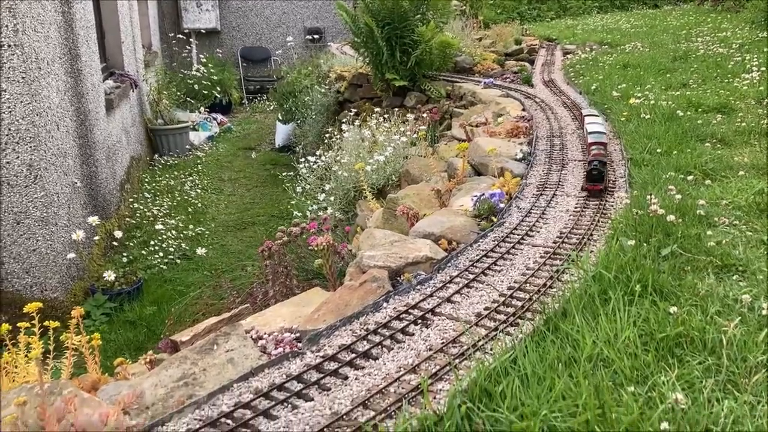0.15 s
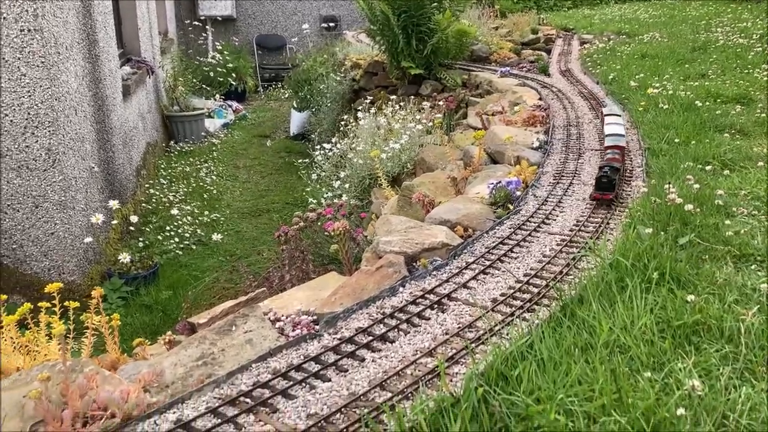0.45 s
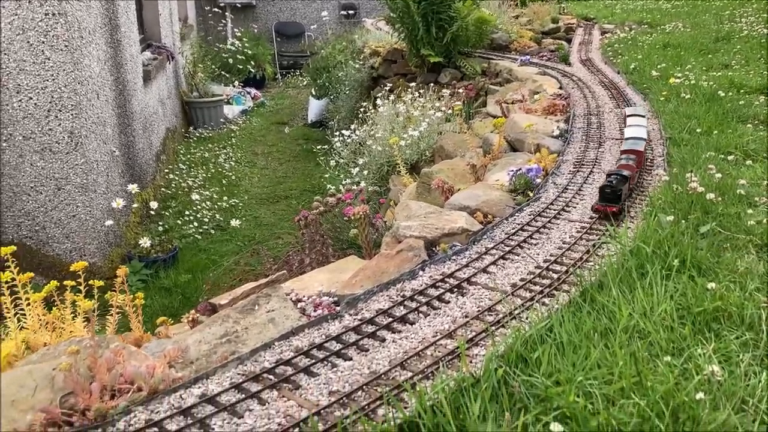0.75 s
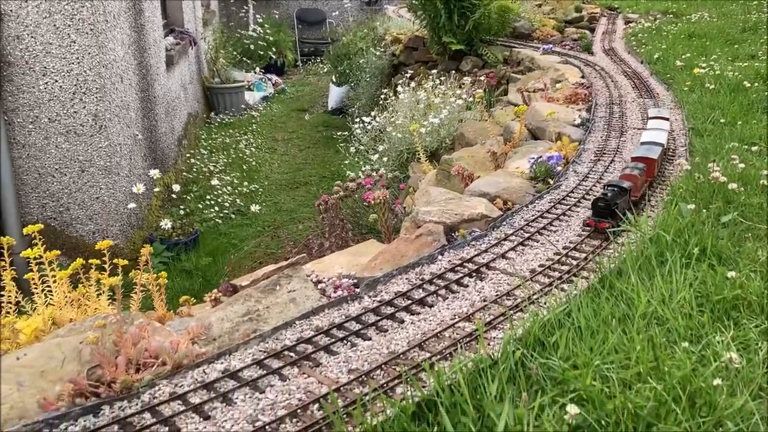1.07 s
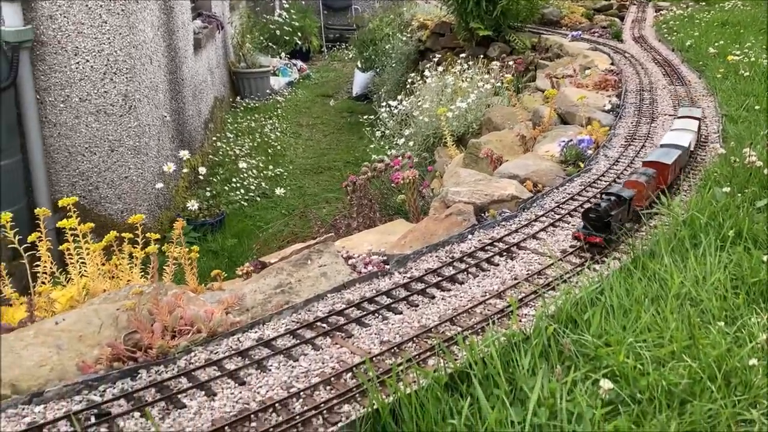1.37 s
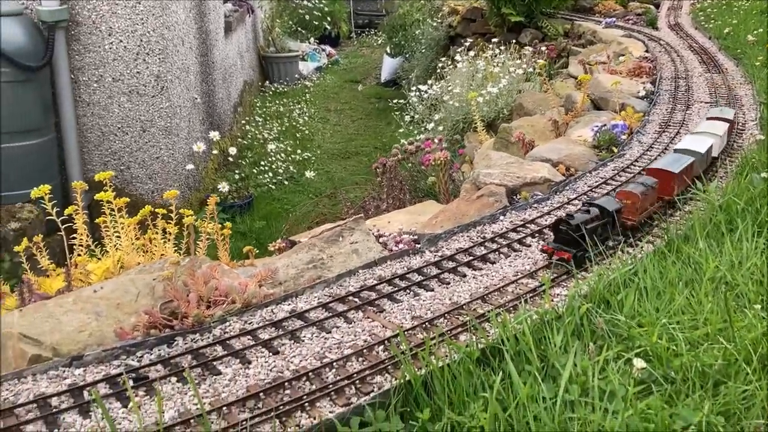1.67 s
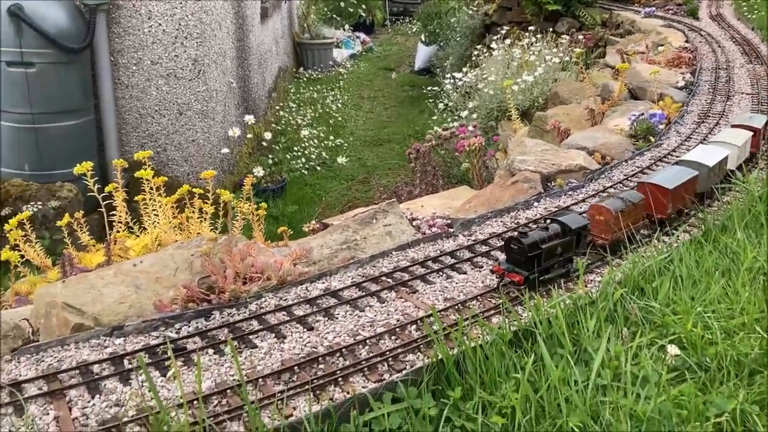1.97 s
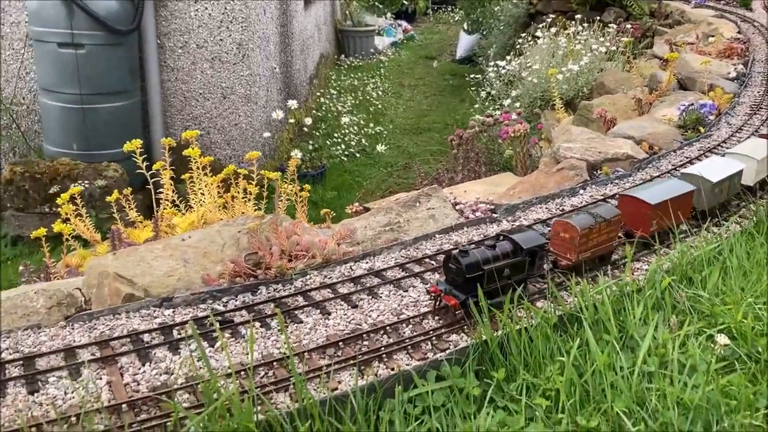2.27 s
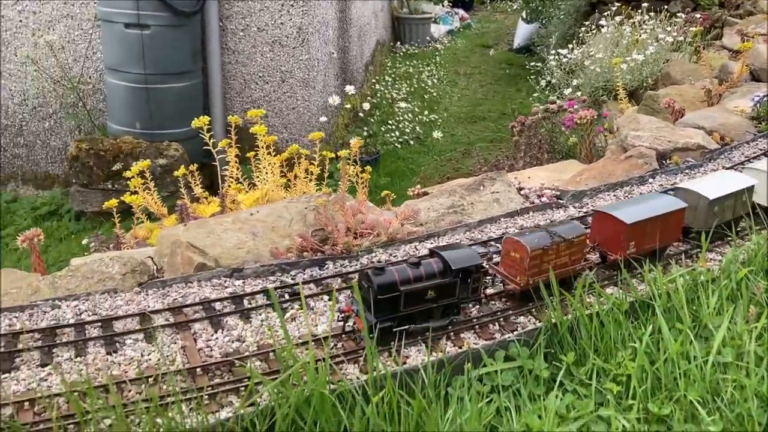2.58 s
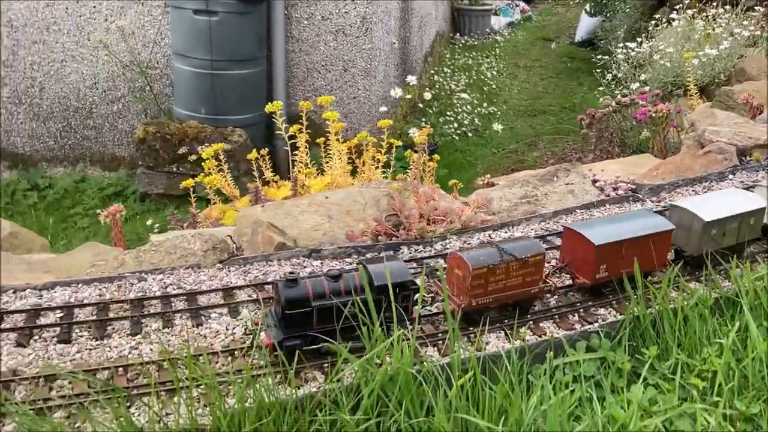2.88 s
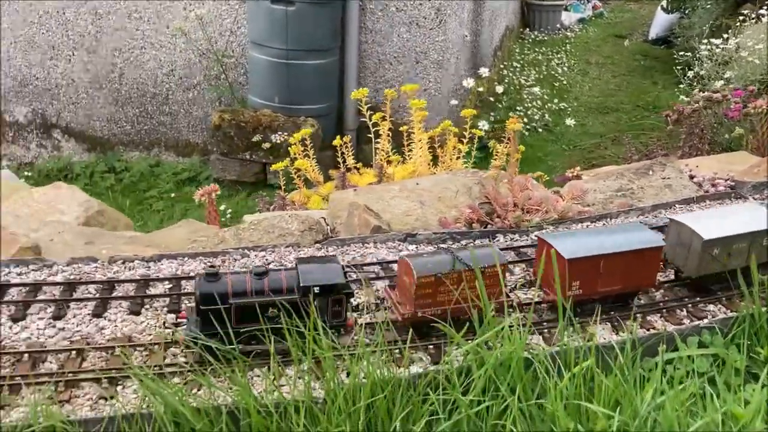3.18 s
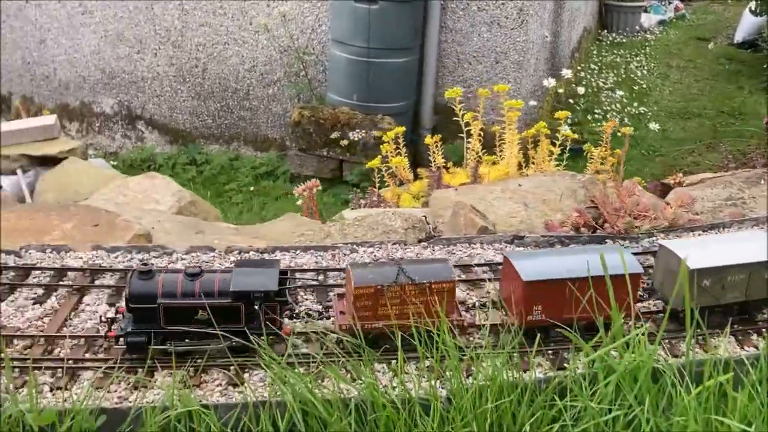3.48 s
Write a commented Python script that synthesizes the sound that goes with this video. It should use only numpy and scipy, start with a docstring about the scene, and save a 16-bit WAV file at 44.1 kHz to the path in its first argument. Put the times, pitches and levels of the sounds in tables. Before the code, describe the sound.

A clockwork tinplate train approaches along a garden track, droning and rattling brightly, with sharp uneven clacks at rail joints and small flange pings; hollow wagons drum louder as it passes close to a wind-buffeted outdoor microphone.

```python
"""A clockwork tinplate train comes along a garden track, droning and rattling from the start, and passes close by.
Tiny bumps under the wheels ring the track and, as the train nears, the hollow wagons drum louder.
Noise shaped by small ticks makes the rattle of gears and couplings; sudden cracks are wheels on rail joints.
Short rubs make the flanges ping. Low noise in puffs is a light wind buffeting the microphone."""
import sys
import numpy as np
from scipy import signal
from scipy.fft import rfft, irfft, next_fast_len
from scipy.io import wavfile
from scipy.ndimage import uniform_filter1d

SR = 44100
rng = np.random.default_rng(int(sys.argv[2]) if len(sys.argv) > 2 else 0)


def put_to_file(sound):
    """Save the sound as 16-bit audio at rate SR, in the file named by the first command-line argument."""
    columns = np.atleast_2d(sound).T  # one column per channel
    safe = np.clip(columns, -1, 1)
    whole_steps = np.round(safe * 32767)
    wavfile.write(sys.argv[1], SR, whole_steps.astype(np.int16))


N = 160524

# Likeness says how alike left and right are (1 = the same); a negative pan leans to the right.
DRONE_LIKENESS, BODY_PAN_DB = 0.6, -0.5


def track():
    """The rails and their bed drone under the wheels, with no bass; one rail sings out of the bend."""
    # Level of the drone. Each row: time in seconds, level in dB.
    drone_curve = [(0, -51), (.55, -48.5), (2.55, -49.5), (2.85, -52), (3.64, -53)]
    # Resonances of the track. Each row: pitch in Hz, width in Hz, strength in dB.
    track_modes = [(648, 72, -4), (782, 51, -3.5), (876, 37, 1.5), (951.4, 72, -2), (1276, 150, -9.5),
                   (2150, 450, -15.5)]
    # Level of the singing rail. Each row: time in seconds, level in dB.
    singing_curve = [(1.7, -71), (2.05, -57), (2.5, -56), (2.8, -63)]
    # Resonance of that rail. Each row: pitch in Hz, width in Hz, strength in dB.
    rail_mode = [(1826, 39, 0)]
    low_hz, drone_pan_db = 520, -5
    drone = rolling(track_modes, DRONE_LIKENESS, drone_pan_db)
    thin = signal.butter(2, low_hz, "high", fs=SR, output="sos")
    drone = signal.sosfilt(thin, drone)
    singing = rolling(rail_mode, DRONE_LIKENESS, BODY_PAN_DB)
    return level(drone_curve) * drone + level(singing_curve) * singing


def wagons():
    """Hollow tin bodies drum, and boom when jolted; the track bed rumbles under their weight."""
    # Level of the drumming. Each row: time in seconds, level in dB.
    drum_curve = [(0, -56), (1.7, -57), (2.1, -53), (3.0, -49.5), (3.4, -45)]
    # Jolts that make a body boom. Each row: middle in seconds, half length in seconds, level in dB.
    jolts = [(2.842, 0.0075, -42), (2.962, 0.012, -43), (3.073, 0.004, -41.5), (3.334, 0.016, -49),
             (3.494, 0.017, -42.5)]
    # Resonances of the wagon bodies. Each row: pitch in Hz, width in Hz, strength in dB.
    body_modes = [(307, 200, -2), (564, 58, 2.5), (880, 145, 0), (1105, 250, 3.5), (1208, 40, 2),
                  (1388, 115, 1.5), (1622, 110, 1), (1820, 220, 2.5)]
    # Level of the rumble. Each row: time in seconds, level in dB.
    rumble_curve = [(0, -77), (1.5, -83.5), (2.3, -67)]
    # Resonance of the track bed. Each row: pitch in Hz, width in Hz, strength in dB.
    bed_mode = [(197.7, 102, 0)]
    body_likeness = 0.33
    drumming = rolling(body_modes, body_likeness, BODY_PAN_DB)
    # Two passes through the resonance make the rumble narrower.
    rumble = resonate(resonate(pair(DRONE_LIKENESS), bed_mode), bed_mode)
    return surging(drum_curve, jolts) * drumming + level(rumble_curve) * rumble


def rolling(modes, likeness, pan_db):
    """Tiny bumps under the wheels set a set of resonances ringing."""
    bumps_per_s, throb_db = 5000, 0.66
    low_hz, high_hz = 352, 2550
    hits = rng.random(N) < bumps_per_s / SR
    bumps = pair(likeness, pan_db) * hits * throb(throb_db)
    band = signal.butter(2, [low_hz, high_hz], "band", fs=SR, output="sos")
    return rms_one(signal.sosfilt(band, resonate(bumps, modes)))


def throb(depth_db):
    """Swing of level, up and down by the depth, with each turn of the driving wheels."""
    # Speed of the wheels, slowing a little. Each row: time in seconds, speed in turns per second.
    wheel_speed = [(0, 7.4), (2.6, 6.92), (3.3, 5.85)]
    tight_spot_turns = 0.25  # where in each turn the wheels bind
    turns = np.cumsum(np.interp(clock(), *np.transpose(wheel_speed))) / SR
    return rms_one(from_db(depth_db * np.cos(2 * np.pi * (turns - tight_spot_turns))))


def rattle():
    """Large and small loose parts rustle with each wheel turn, partly in step; joints strike them all."""
    # Level of the rattle of gears and couplings. Each row: time in seconds, level in dB.
    rattle_curve = [(0, -47.5), (1.3, -45.5), (1.95, -42), (2.45, -44), (2.6, -44), (2.9, -40),
                    (3.27, -45.5), (3.64, -40.5)]
    throb_db, flurry_low_db = 1, -3.5
    split_hz, own_share = 7000, .4  # large parts sound below the split, small ones above
    swing = rms_one(shake() * throb(throb_db))
    steady = (level(rattle_curve) * swing) ** 2
    shared, flurry, joints = ticking(), flurries(), clacks()
    out = 0
    for side, flurry_db in (("low", flurry_low_db), ("high", 0)):
        grain = (1 - own_share) * shared + own_share * ticking()
        power = (steady + from_db(flurry_db) ** 2 * flurry) * grain + joints
        split = signal.butter(2, split_hz, side, fs=SR, output="sos")
        out = out + signal.sosfilt(split, steel(power))
    return out


def ticking():
    """Power of small ticks at uneven gaps over the whirr of the gears; mean 1."""
    ticks_per_s, spread_db, t60_s = 130, 2.9, .019
    whirr_db = -4.5  # against the mean power of the ticks
    gaps = rng.gamma(2, .5, N // 100)  # mean 1
    at = (np.cumsum(gaps) * SR / ticks_per_s).astype(int)
    at = at[at < N]
    ticks = np.zeros(N)
    ticks[at] = from_db(spread_db * np.clip(rng.standard_normal(len(at)), -2, 2)) ** 2
    # Power falls by 60 dB in t60_s; from_db is for amplitude, hence the 120.
    power = signal.lfilter([1], [1, -from_db(-120 / (t60_s * SR))], ticks + 1e-18)
    power = power / power.mean() + from_db(whirr_db) ** 2
    return power / power.mean()


def shake():
    """Uneven swing of level as the wagons are shaken about."""
    fastest_hz, depth_db = 11, 1.4
    smooth = signal.butter(2, fastest_hz, fs=SR, output="sos")
    slow = signal.sosfilt(smooth, rng.standard_normal(N + SR))[SR:]  # drop the settling second
    return from_db(depth_db * np.clip(rms_one(slow), -2, 2))


def flurries():
    """Power of the bright, hissing flurries of shaken couplings: each starts at once, holds and dies away."""
    # Each row: start in seconds, length in seconds, level in dB.
    flurry_rows = [(2.095, 0.027, -42.5), (2.255, .075, -41), (2.695, 0.043, -36), (3.143, .07, -42.5)]
    t60_s = 0.068
    t = clock()
    power = 0
    for s, length, db in flurry_rows:
        power = power + (t >= s) * (from_db(db) * decay(t - s, length, t60_s)) ** 2
    return power


def clacks():
    """Power of the wheels clacking over rail joints: a sudden crack, then weaker chatter. The faint row at 1.84
    s is instead the sharp strike that opens a flange ping."""
    # Each row: start in seconds, level in dB. The row at 1.84 s is a flange strike.
    clack_rows = [(.364, -45), (0.8212, -37), (1.2396, -35.5), (1.553, -38), (1.8053, -37.5), (1.84, -47),
                  (2.0967, -33.5), (2.2435, -34), (2.542, -33), (2.6886, -35), (2.959, -34), (3.001, -36),
                  (3.006, -32.5), (3.3306, -42), (3.5327, -37.5)]
    hold_s, crack_t60_s = .003, .022
    chatter_db, chatter_t60_s = -12, .14
    power, age = np.zeros(N + SR), clock()[:SR // 4]
    crack = decay(age, hold_s, crack_t60_s)
    chatter = from_db(chatter_db) * decay(age, 0, chatter_t60_s)
    shape = crack ** 2 + chatter ** 2
    for s, db in clack_rows:
        start = int(s * SR)
        power[start:start + len(age)] += from_db(db) ** 2 * shape
    return power[:N]


def steel(power):
    """Contacts ring in dense steel modes; the recorder widens the stereo, top treble late and inverted on the left."""
    # Ring of the small steel parts. Each row: frequency in Hz, strength per Hz in dB.
    steel_colour = [(500, -18), (2000, -8), (2900, -6.5), (4100, -4.5), (5200, -8), (7600, -8.5),
                    (8500, -1.5), (11000, 1), (13400, -3), (15000, -3.5)]
    # Thin singing of the clockwork. Each row: pitch in Hz, width in Hz, strength in dB.
    spring_modes = [(8047, 30, -10), (10885, 18, 0), (12397, 16, -9), (14826, 20, -4)]
    likeness, lag_ms, opposed_above_hz = .78, .221, 7600
    spring_db = -14  # against the contacts
    left, right = pair(likeness)
    hz = np.arange(N // 2 + 1) * SR / N
    # Below the turning point the left side is a noise of its own.
    own_share = 1 / (1 + (hz / opposed_above_hz) ** 12)
    own = rfft(rng.standard_normal(N))
    late = -rfft(left) * np.exp(-2j * np.pi * hz * lag_ms / 1000)
    left = irfft(np.sqrt(1 - own_share) * late + np.sqrt(own_share) * own, N)
    contacts = np.array([left, right]) * np.sqrt(power)
    singing = from_db(spring_db) * contacts.std() * resonate(contacts, spring_modes)
    return colour(contacts, steel_colour) + singing


def flanges():
    """A flange strikes and rubs the rail and the wheel rings; lighter touches cluster at each turn."""
    # Pings and squeals. Each row: start in seconds, length in seconds, level in dB, pitch in Hz.
    pings = [(0.745, 0.12, -54, 3760), (0.851, 0.0028, -45, 3700), (0.947, .085, -58.5, 3900),
             (0.99, 0.0095, -44, 3830), (1.551, 0.0042, -42, 3470), (1.691, 0.0069, -44.5, 3630),
             (1.838, 0.0057, -39.5, 3550), (2.098, .045, -59, 3460), (3.164, 0.044, -50, 4370),
             (3.367, 0.007, -47.5, 3860)]
    # Level of light touches along the bend. Each row: time in seconds, level in dB.
    touch_curve = [(0, -58.5), (.9, -64), (2.2, -55), (2.5, -64)]
    # Resonances of the wheels. Each row: pitch in Hz, width in Hz, strength in dB.
    wheel_modes = [(3485, 77, 22.5), (3930, 41, 18)]
    likeness, ping_t60_s, ping_width_hz = .65, .04, 135
    touches_per_s, throb_db = 150, 4.5
    out, rub, age = np.zeros((2, N)), pair(likeness), clock()[:SR // 6]
    for s, length, db, hz in pings:
        start = int(s * SR)
        span = slice(start, start + len(age))
        shape = decay(age, length, ping_t60_s)
        ring = resonate(rub[:, span] * shape, [(hz, ping_width_hz, 0)])
        out[:, span] += from_db(db) * np.sqrt(np.mean(shape ** 2)) * ring
    hits = rng.random(N) < touches_per_s / SR
    touches = rub * hits * throb(throb_db) + 1e-18
    return out + level(touch_curve) * resonate(touches, wheel_modes)


def wind():
    """Low buffeting on the microphone in separate puffs, over the still air of the garden."""
    # Level of the wind. Each row: time in seconds, level in dB.
    wind_curve = [(0, -73.5), (.95, -74.5), (1.05, -54.5), (2.35, -57.5), (2.72, -64.5), (3.64, -57)]
    # Single puffs. Each row: middle in seconds, half length in seconds, level in dB.
    puffs = [(1.17, 0.027, -49), (1.399, 0.011, -46), (1.554, 0.014, -50), (1.685, 0.042, -44),
             (1.871, 0.022, -46), (2.243, 0.011, -42.5), (2.344, 0.0094, -45), (2.955, 0.014, -45),
             (3.237, .016, -48)]
    # Colour of the wind. Each row: frequency in Hz, strength per Hz in dB.
    wind_colour = [(20, -15), (35, -6), (55, 0), (90, -3.5), (140, -13), (210, -19), (300, -31),
                   (1500, -70)]
    # Colour of the still air. Each row: frequency in Hz, strength per Hz in dB.
    air_colour = [(30, -9), (120, -6.5), (340, -14), (700, 0.5), (1200, 2.5), (2200, 3.5), (6000, -10.5),
                  (15000, -10)]
    wind_likeness, air_likeness, air_db = .62, .55, -55.5
    steady_s = .05  # chance swings of level are evened out over this time
    eddies = colour(pair(wind_likeness), wind_colour)
    local_power = uniform_filter1d(np.mean(eddies ** 2, axis=0), int(steady_s * SR))
    eddies = eddies / np.sqrt(local_power + 1e-9)
    air = from_db(air_db) * colour(pair(air_likeness), air_colour)
    return surging(wind_curve, puffs) * eddies + air


def from_db(db):
    """Decibels to gain."""
    return 10 ** (np.asarray(db) / 20)


def rms_one(x):
    """Scale to unit power."""
    return x / np.sqrt(np.mean(x ** 2) + 1e-20)


def clock():
    """Time of each sample in seconds."""
    return np.arange(N) / SR


def level(rows):
    """Gain along a curve of times in seconds and levels in dB."""
    return from_db(np.interp(clock(), *np.transpose(rows)))


def swell(s, width):
    """A brief bell-shaped rise and fall."""
    return np.exp(-.5 * np.minimum(((clock() - s) / width) ** 2, 100))


def surging(curve, swells):
    """Gain of a level curve with brief swells added to its power."""
    power = level(curve) ** 2
    for s, width, db in swells:
        power = power + (from_db(db) * swell(s, width)) ** 2
    return np.sqrt(power)


def decay(age, hold, t60):
    """Hold, then die away by 60 dB in the time t60."""
    return from_db(-60 * np.maximum(age - hold, 0) / t60)


def pair(likeness, pan_db=0):
    """Two white noises, partly alike, for left and right."""
    mid, side = rng.standard_normal((2, N))
    c = np.clip(likeness, -.99, .99)
    left = np.sqrt(1 + c) * mid + np.sqrt(1 - c) * side
    right = np.sqrt(1 + c) * mid - np.sqrt(1 - c) * side
    return rms_one(np.array([left, right]) * from_db([[pan_db / 2], [-pan_db / 2]]))


def colour(x, points):
    """Causal filter with the given spectrum; keeps the power of white noise."""
    size = 2 * next_fast_len(N // 2 + 4096)
    hz, db = np.transpose(points)
    bins_hz = np.arange(size // 2 + 1) * SR / size
    gain = rms_one(from_db(np.interp(np.log(bins_hz + 1), np.log(hz), db)))
    # Folding the cepstrum forward in time makes the filter respond only after its input.
    cepstrum = irfft(np.log(gain))
    cepstrum[1:size // 2] *= 2
    cepstrum[size // 2 + 1:] = 0
    return irfft(rfft(x, size) * np.exp(rfft(cepstrum)))[..., :N]


def resonate(x, modes):
    """Resonances side by side, with alternating sign, each with its share of the power."""
    out = 0
    for k, (hz, width, db) in enumerate(modes):
        r = np.exp(-np.pi * width / SR)
        poles = [1, -2 * r * np.cos(2 * np.pi * hz / SR), r * r]
        ring = rms_one(signal.lfilter([1, 0, -1], poles, x))
        out = out + (-1) ** k * from_db(db) * ring
    return rms_one(out)


def scene():
    """The train and the garden."""
    return track() + wagons() + rattle() + flanges() + wind()


def record(dry):
    """The top is cut steeply."""
    cutoff_hz = 15680
    return signal.sosfilt(signal.ellip(12, .1, 80, cutoff_hz, fs=SR, output="sos"), dry)


dry = scene()
out = record(dry)
put_to_file(out)
```